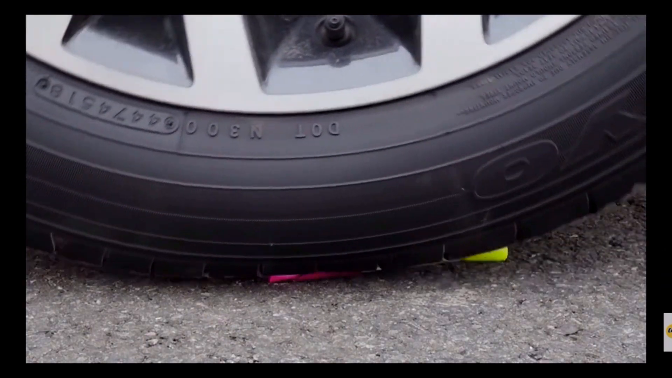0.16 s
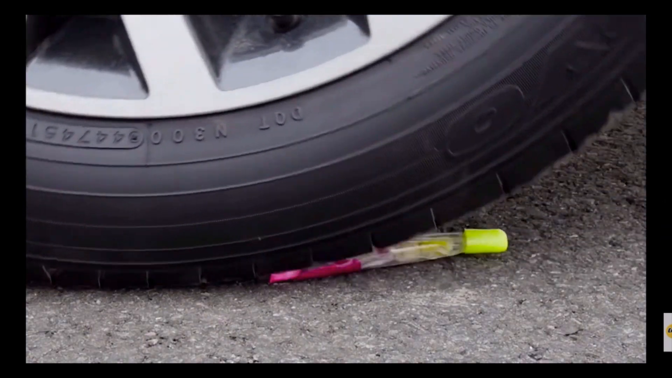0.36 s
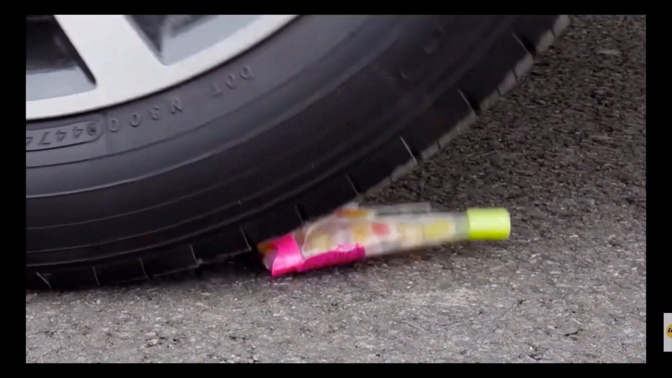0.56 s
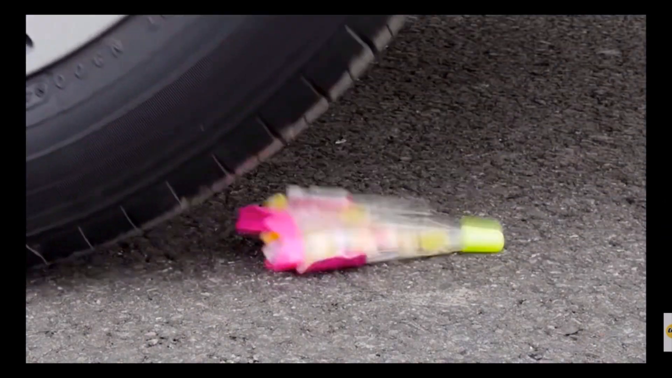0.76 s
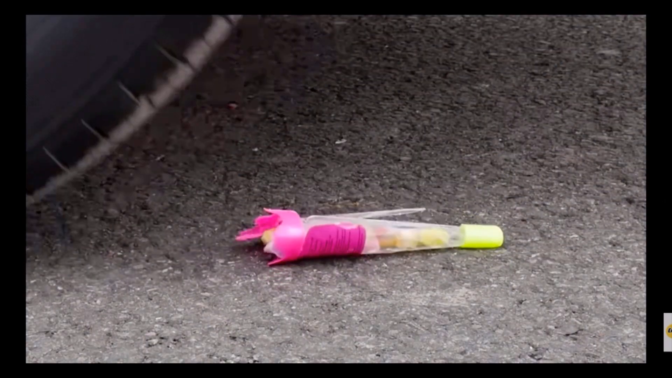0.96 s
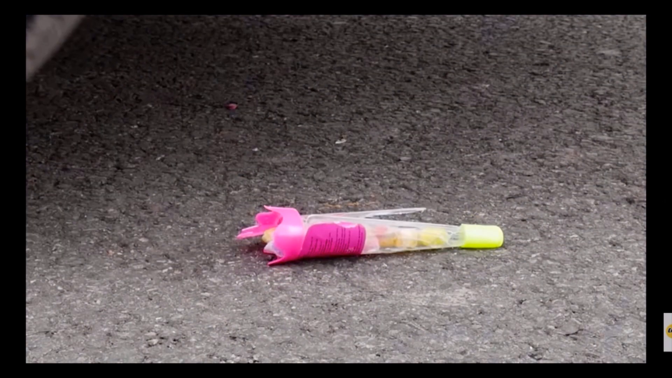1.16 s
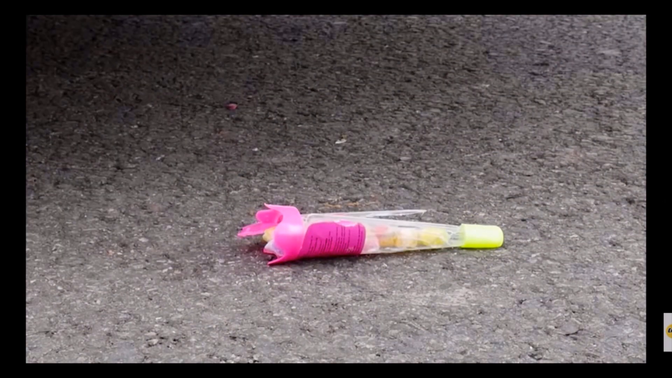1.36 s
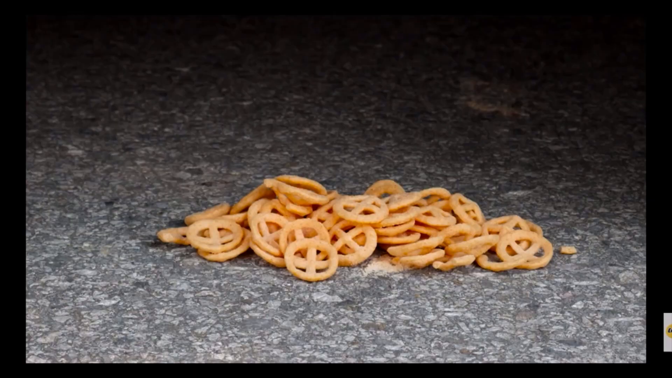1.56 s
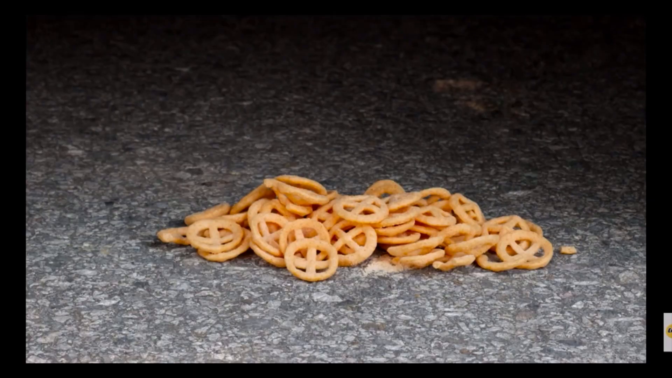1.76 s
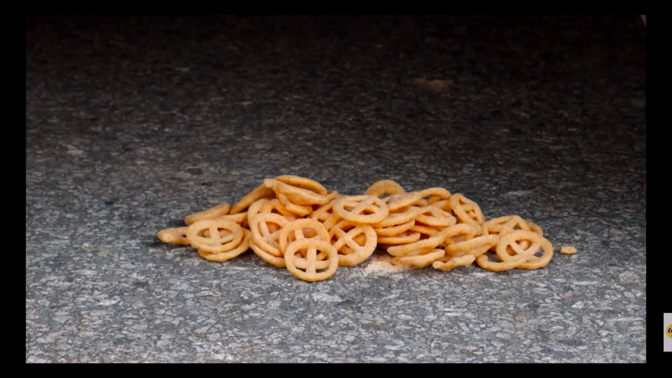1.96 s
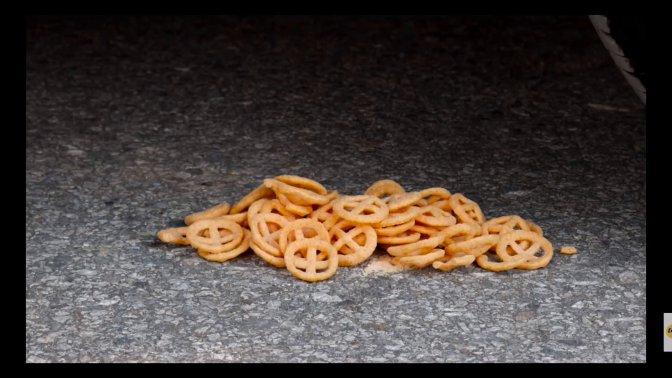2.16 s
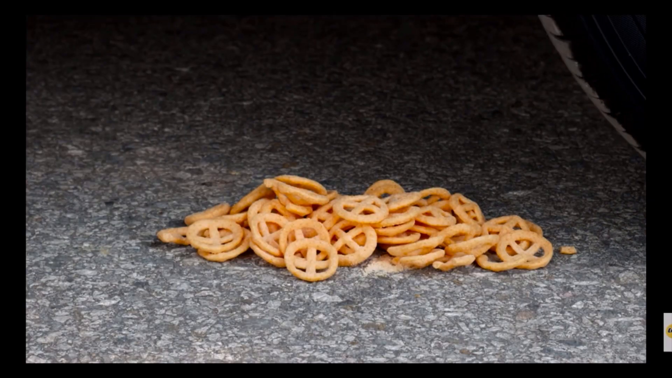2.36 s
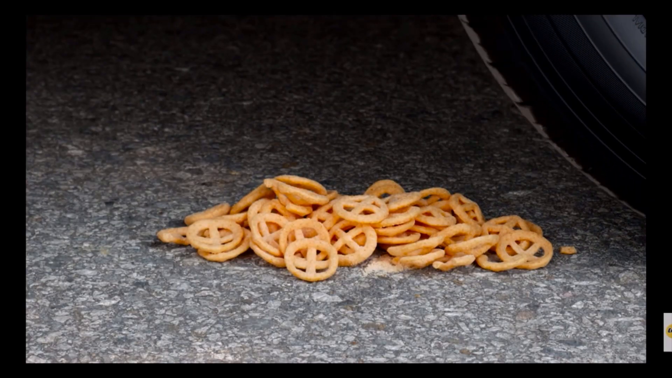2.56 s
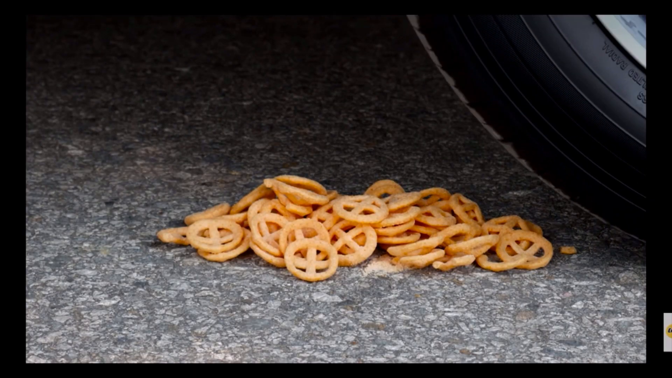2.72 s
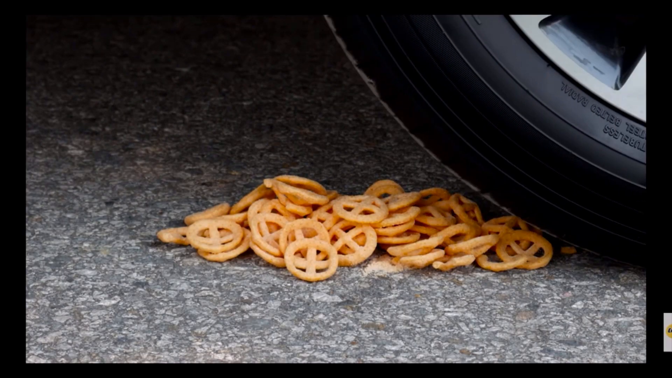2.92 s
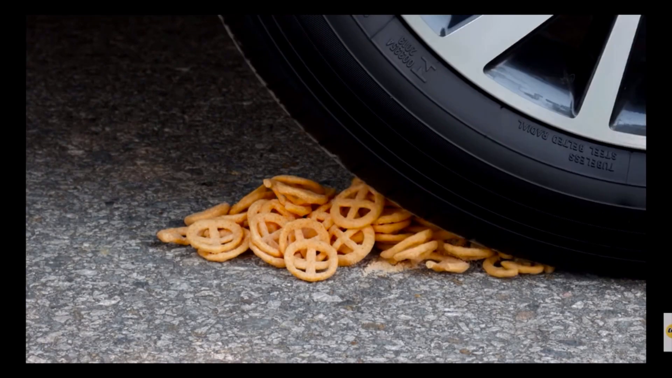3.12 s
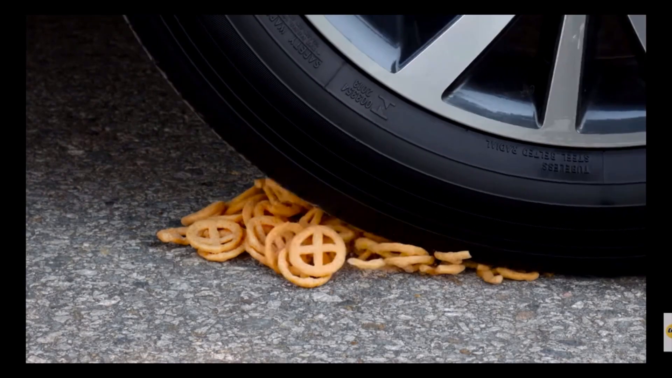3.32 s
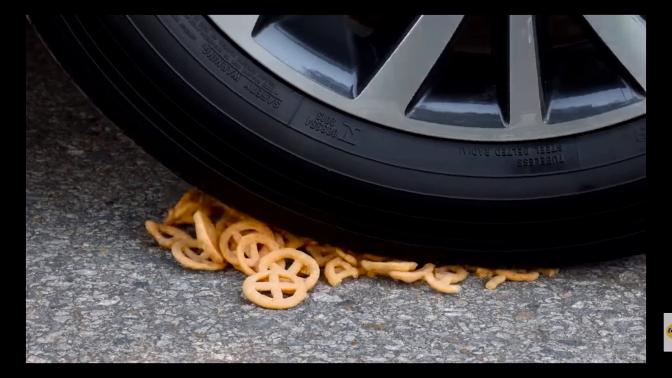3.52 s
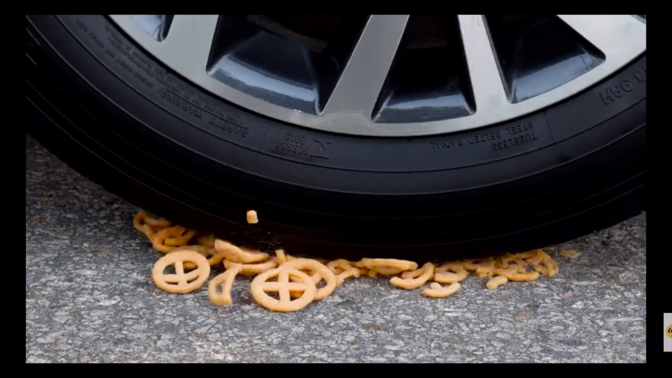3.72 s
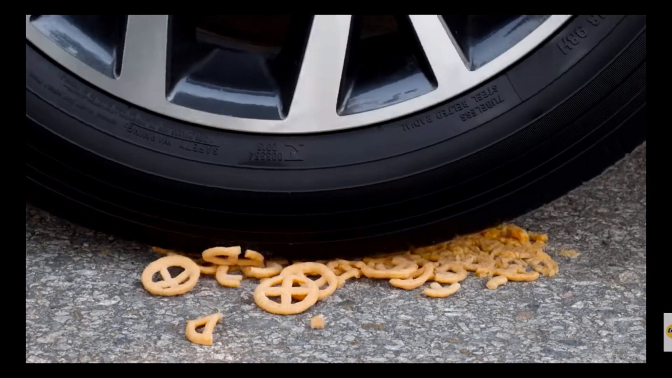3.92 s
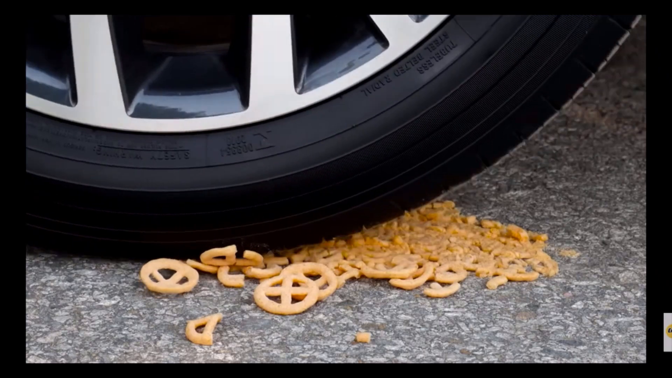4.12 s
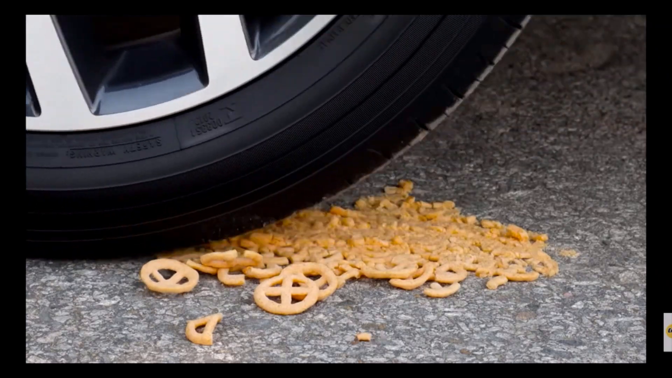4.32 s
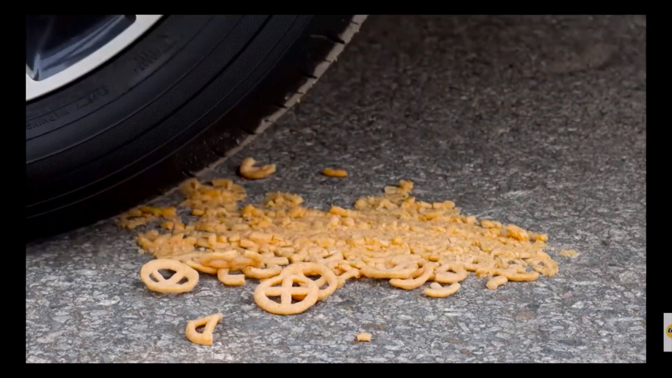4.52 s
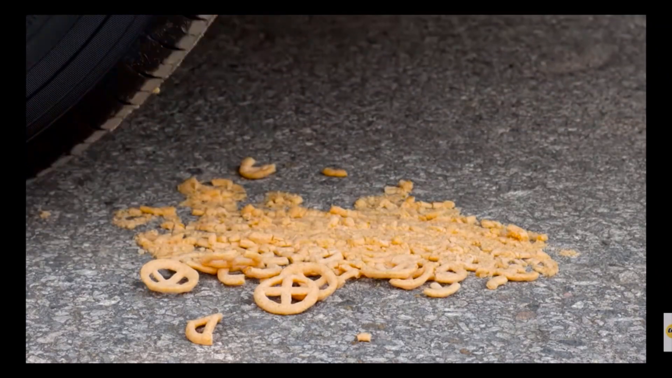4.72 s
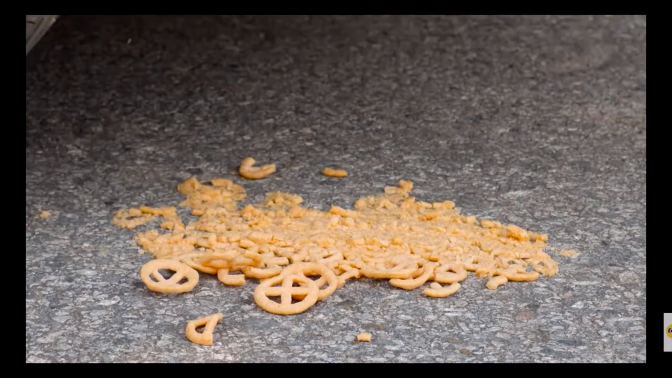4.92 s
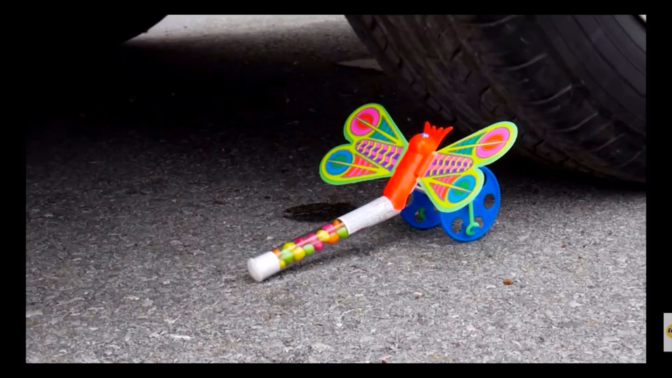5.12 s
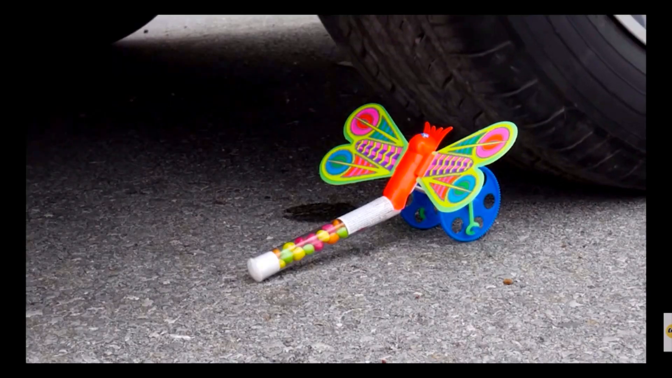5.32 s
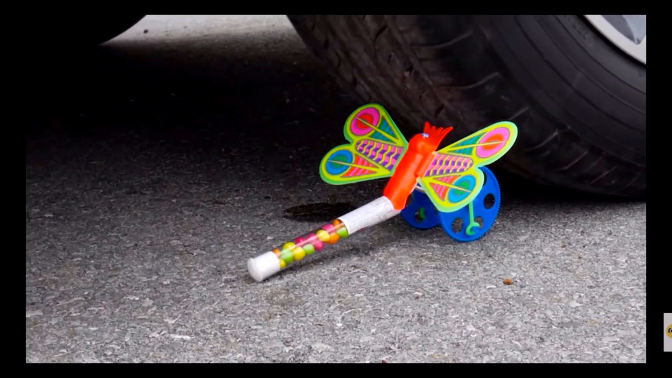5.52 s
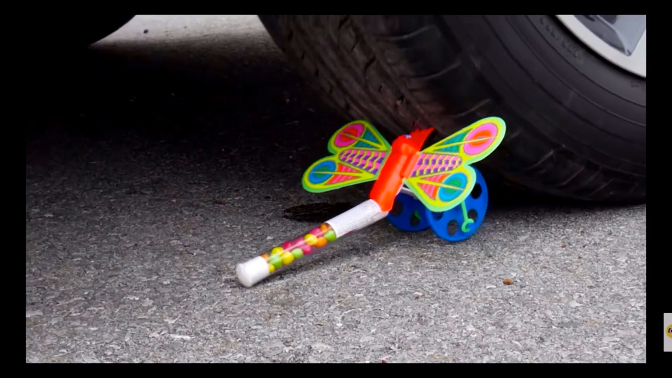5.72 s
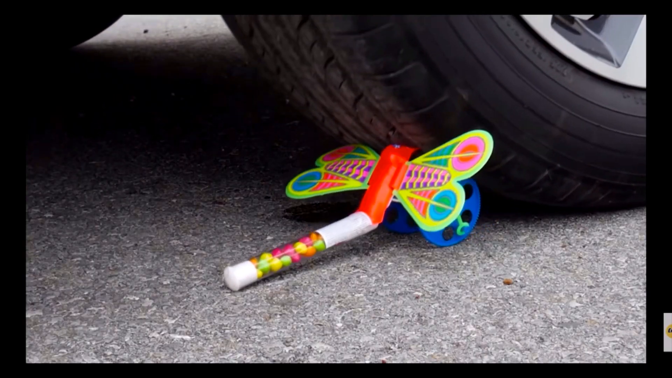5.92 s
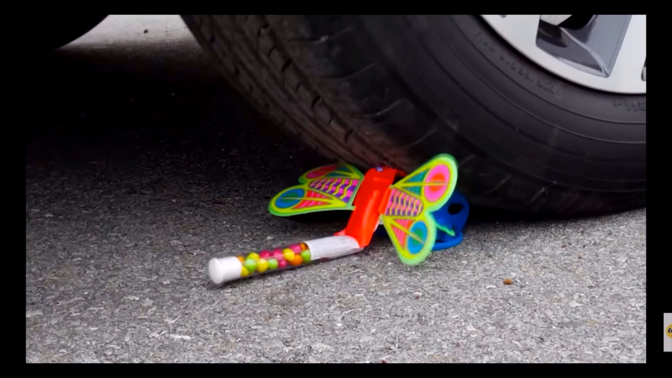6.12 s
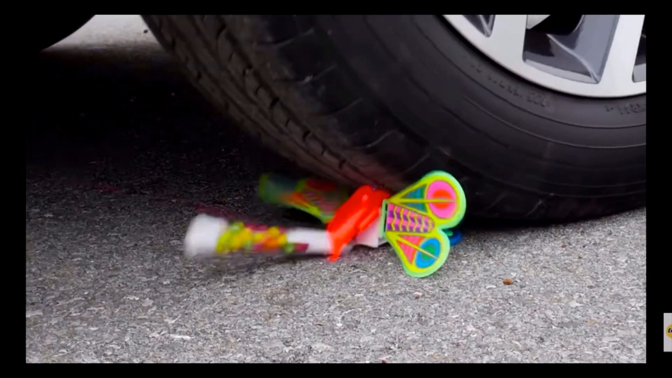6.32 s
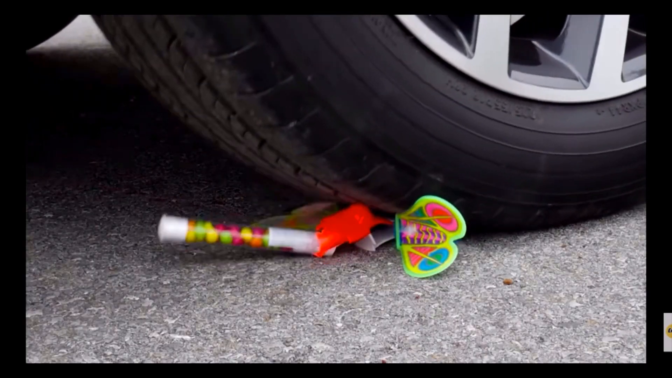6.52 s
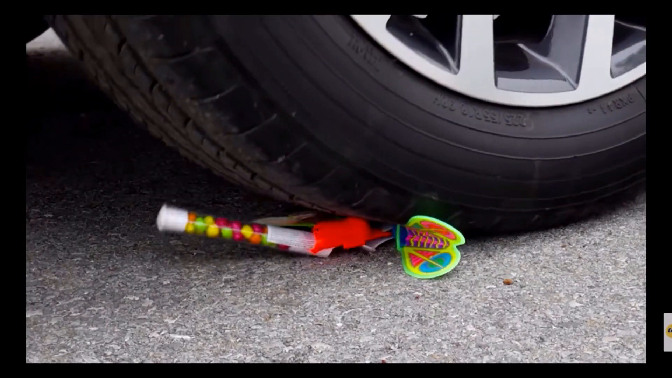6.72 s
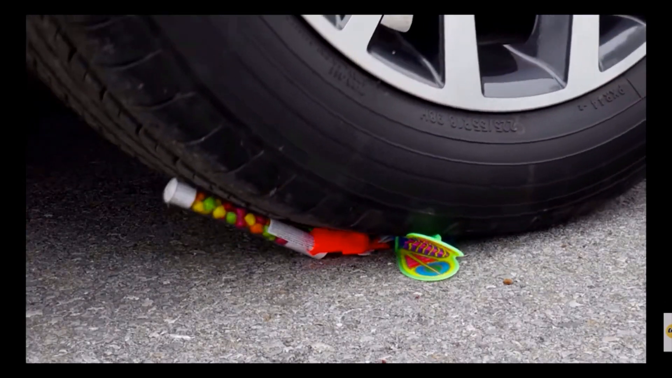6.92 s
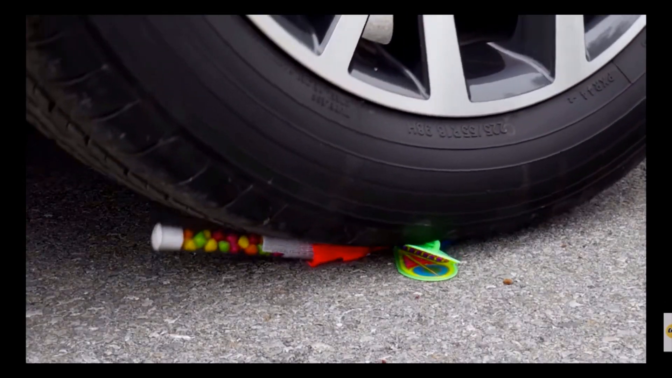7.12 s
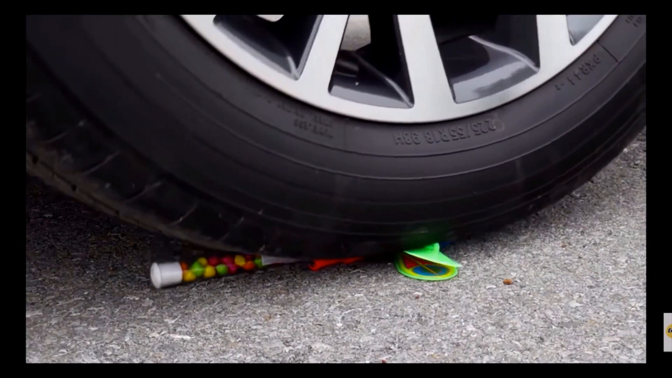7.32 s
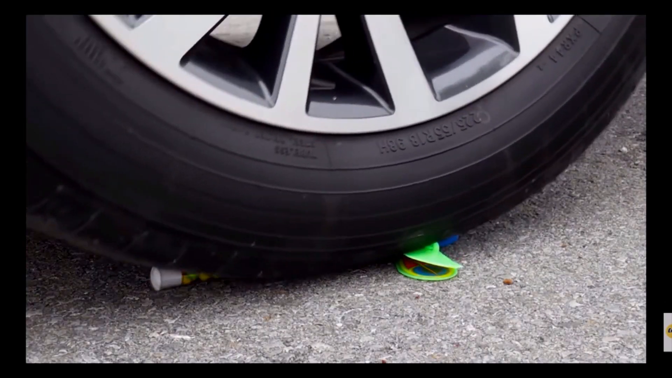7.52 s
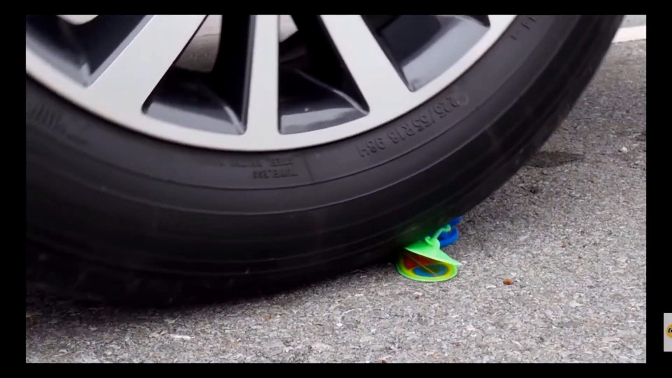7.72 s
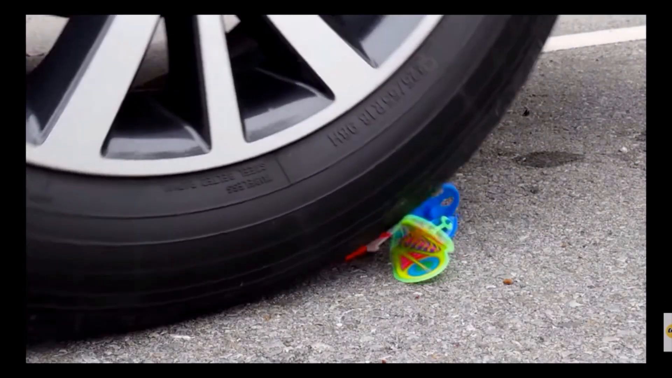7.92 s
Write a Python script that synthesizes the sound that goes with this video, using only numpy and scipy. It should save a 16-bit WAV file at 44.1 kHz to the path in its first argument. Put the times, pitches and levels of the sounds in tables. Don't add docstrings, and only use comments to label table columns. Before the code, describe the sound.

A small, close microphone at road level gives a dry, boxy, midrange sound with a slightly watery grain. From 0 to 0.9 seconds a tyre crushes a plastic toy: sharp irregular snaps and bright cracks, strongest near 0.2, 0.25 and 0.8, over faint grinding and a small thud. Then an idling engine is left, its valve clatter throbbing quickly over soft exhaust rumble, louder from 1.5, with a faint panel drone until about 2. From 2.9 to 4.2 dry snacks crunch in dense, surging, gritty grinding with loud pops, thinning to a few stray ticks by 4.5. Engine clatter returns around 5. From 5.6 to 8 a second plastic toy breaks in hard cracks, busiest from 5.8 to 6.9, then more scattered snaps and another flurry near 7.8, with dull knocks around 6.8, 7.6 and 7.8. Treble vanishes for brief instants throughout.

```python
import sys
import numpy as np
from scipy import signal
from scipy.fft import rfft, irfft
from scipy.io import wavfile
from scipy.ndimage import uniform_filter1d

SR = 44100
rng = np.random.default_rng(int(sys.argv[2]) if len(sys.argv) > 2 else 0)


def generate_wav(sig):
    pcm = np.round(np.clip(np.atleast_2d(sig).T, -1, 1) * 32767).astype(np.int16)
    wavfile.write(sys.argv[1], SR, pcm)


def linear_from_db(decibels):
    return 10 ** (np.asarray(decibels, float) / 20)


N = 351477
TIME = np.arange(N) / SR

# touch_s, leave_s, steady grinding level_db, crunch_db and fizz_db against it
HEAP_PASSES = [
    (-7, 0.93, -36.5, -6, -16.5),
    (3, 4.2, -24.5, -8.5, -7.5),
    (5.5, 14, -34, -12, -13.5),
]
# freq_hz, level_db
FRACTURE_COLOUR = [(200, -19.5), (350, -8), (580, -2.5), (1000, -3), (3000, 0.5), (6000, 5), (16000, 0)]


def evened(x):
    return x / np.sqrt(np.mean(x ** 2) + 1e-20)


def peaked(x, db):
    return linear_from_db(db) * x / abs(x).max()


def read(points, hz):
    f, value = np.transpose(points)
    return np.interp(np.log(hz + 1), np.log(f + 1), value)


def add(mix, start_s, sound):
    part = mix[round(start_s * SR):][:len(sound)]
    part += sound[:len(part)]


def band(x, lo_hz, hi_hz):
    edges_hz = [max(lo_hz, 20), min(hi_hz, 0.45 * SR)]
    return signal.sosfilt(signal.butter(4, edges_hz, "band", fs=SR, output="sos"), x)


def coloured(x, *tables, size=4096):
    # freq_hz, level_db
    mic_response = [(200, -27), (600, -13), (1000, -2.5), (3100, 0), (4000, -12), (5000, -7.5), (7500, -16),
                    (9500, -19.5), (13000, -35.5), (15400, -36), (16300, -79)]
    # centre_hz, width_hz, level_db
    mic_cavities = [(778, 86, -14.5), (1500, 104, -2.5), (5564, 366, -13), (6386, 810, 12.5),
                    (10240, 170, 5), (10720, 180, -6), (11340, 320, 6), (12400, 350, -13),
                    (13700, 500, 3.5)]
    hz = abs(np.fft.fftfreq(size, 1 / SR))
    db = read(mic_response, hz) + sum(read(table, hz) for table in tables)
    db = db + sum(g * np.exp(-0.5 * ((hz - f) / w) ** 2) for f, w, g in mic_cavities)
    log_gain = np.log(linear_from_db(db))
    taps = np.fft.ifft(np.exp(log_gain - 1j * signal.hilbert(log_gain).imag)).real
    return signal.oaconvolve(x, taps[:size // 2])[:len(x)]


def wander(hz):
    steps = rng.standard_normal(N // 64 + 2)
    smooth = uniform_filter1d(steps, int(SR / 128 / hz) + 1)
    slow = signal.lfilter([1], [1, -np.exp(-2 * np.pi * hz * 64 / SR)], smooth)
    return evened(np.interp(np.arange(N) / 64, np.arange(len(slow)), slow))


def waver(hz, width_hz):
    turn = 2 * np.pi * hz * TIME
    return wander(width_hz) * np.cos(turn) + wander(width_hz) * np.sin(turn)


def cracks(per_s, spread_db, clump_db, count=18):
    often = per_s / SR * linear_from_db(clump_db * wander(90.))
    size = linear_from_db(spread_db * np.minimum(rng.exponential(1, N), 4.1)) * (rng.random(N) < often)
    piece = rng.integers(0, count, N)
    t = np.arange(400) / SR
    out = np.zeros(N)
    for k, hz in enumerate(np.geomspace(520, 11500, count)):
        click = evened(rng.standard_normal(len(t)) * np.exp(-t / 0.0003))
        ring = evened(np.sin(2 * np.pi * hz * t) * np.exp(-t * hz / 2.96))
        out += signal.oaconvolve(size * (piece == k), click + 0.25 * ring)[:N]
    return coloured(out, FRACTURE_COLOUR)


def crushing():
    # start_s, hold_s, grinding level_db, brightness_db
    toy_surges = [
        (0, 0.021, -36.5, 3),
        (0.047, 0.017, -34, 0),
        (0.114, 0.029, -36, 1),
        (0.179, 0.021, -28, 7),
        (0.303, 0.019, -35, -5.5),
        (0.418, 0.02, -32, 0),
        (0.533, 0.06, -34, 3),
        (0.8, 0.016, -31, 1),
        (0.826, 0.0055, -26, 16.5),
        (0.834, 0.16, -32, 3),
    ]
    # start_s, hold_s, grinding level_db, brightness_db
    snack_surges = [(2.895, 0.13, -20.5, -10.5), (3.055, 0.069, -20.5, 3.5), (3.158, 0.19, -22.5, -0.5),
                    (3.34, 0.13, -20, -2.5), (3.576, 0.12, -18, -2), (3.736, 0.039, -23, -1),
                    (3.812, 0.049, -17.5, -6.5), (3.883, 0.076, -20.5, -2.5), (3.963, .055, -19.5, -8.5),
                    (4.05, .08, -19, -8), (4.158, 0.14, -24, -15)]
    # start_s, hold_s, grinding level_db, brightness_db
    second_toy_surges = [(5.622, 0.119, -12, -0.5), (5.77, 0.068, -20, -3), (5.863, 0.088, -31.5, 7),
                         (5.954, 0.087, -24.5, -9), (6.028, 0.016, -15, -3.5), (6.05, 0.036, -24, -2),
                         (6.104, 0.1, -26, 2), (6.236, 0.047, -19.5, 1), (6.499, 0.011, -18, -1.5),
                         (6.54, .02, -32, 3), (6.669, 0.057, -26, 0), (6.767, 0.047, -17, 0),
                         (7.04, 0.027, -34, 1), (7.236, 0.077, -31, -5), (7.42, 0.045, -27, -5.5),
                         (7.523, 0.088, -24.5, -8), (7.63, 0.027, -16.5, -3.5), (7.673, .09, -25, -9.5),
                         (7.765, 0.04, -22, -1.5), (7.942, 0.015, -21.5, -3.5)]
    bite_db_per_s, lift_db_per_s = 188, 218
    swell_s, settle_s = 0.0065, 0.018

    grains = cracks(per_s=3600, spread_db=3.6, clump_db=3.6)
    crunch = band(grains, 262, 1445)
    grind = band(grains, 1613, 4215)
    fizz = band(grains, 4800, 22000)
    layers = np.array([evened(crunch), evened(grind), fizz / np.std(band(fizz, 6480, 8700))])
    load = np.zeros((3, N))
    all_surges = (toy_surges, snack_surges, second_toy_surges)
    for (touch, leave, steady_db, crunch_db, fizz_db), surges in zip(HEAP_PASSES, all_surges):
        slope_db = np.minimum(bite_db_per_s * (TIME - touch), lift_db_per_s * (leave - TIME))
        pressed = linear_from_db(np.minimum(slope_db, 0))
        power = linear_from_db(steady_db) ** 2 * np.ones((3, N))
        for start, hold, db, bright_db in surges:
            near = slice(max(round((start - 0.3) * SR), 0), round((start + 0.4) * SR))
            late = TIME[near] - start
            away = np.maximum(-late / swell_s, (late - hold) / settle_s)
            shape = np.exp(-np.maximum(away, 0))
            tilt_db = bright_db * np.array([[-1], [0], [1]])
            power[:, near] += (shape * linear_from_db(db + tilt_db)) ** 2
        layer_db = np.array([[crunch_db], [0], [fizz_db]]) - 5.5
        load += pressed * np.sqrt(power) * linear_from_db(layer_db)
    return (load * layers).sum(0)


def snaps():
    # time_s, ring peak_db, ring_hz, splinters_db against the ring
    toy_snaps = [(0.0553, -22, 2580, -1), (0.0703, -22.5, 1970, 6.5), (0.1078, -9.5, 2080, -7),
                 (0.1176, -6.5, 1140, -17), (0.1293, -20, 1200, -7), (0.1346, -8.5, 2910, -7),
                 (0.1468, -14, 1130, -13), (0.1687, -11.5, 2760, -6), (0.18, -3, 2160, -13.5),
                 (0.2234, -24.5, 2200, 5), (0.2332, -22, 1780, 0), (0.2578, -2, 1990, -17.5),
                 (0.305, -15, 1990, -13.5), (0.3166, -13, 2770, -19), (0.3798, -11.5, 2960, -15),
                 (0.4144, -17, 2260, -19), (0.4228, -15.5, 2750, -4), (0.4758, -18.5, 2900, -17),
                 (0.5368, -14, 2330, -11.5), (0.5455, -26, 2280, -6), (0.6242, -16, 2980, -12),
                 (0.7192, -17, 2160, -18), (0.7765, -2.5, 2300, -22), (0.8086, -18, 2270, -8),
                 (0.824, -11.5, 3320, 0), (0.8274, -17, 2820, 2), (0.8693, -21.5, 2100, 2.5),
                 (0.9128, -21, 2100, -5.5)]
    # time_s, ring peak_db, ring_hz, splinters_db against the ring
    snack_snaps = [(3.0438, -9.5, 1240, -2), (3.0599, -9, 2730, -11), (3.0722, -9, 2590, -2),
                   (3.0919, -5.5, 3250, -16), (3.1232, -6, 2420, -27), (3.1537, -11, 2410, -3),
                   (3.1695, -11, 2300, -15), (3.2081, -3, 1940, -16), (3.2725, -5, 2220, -28),
                   (3.337, -3, 2000, -32), (3.395, -1.5, 1920, -14), (3.6882, 1.5, 1550, -23),
                   (3.7166, -21, 2905, -18), (3.7263, -14, 1140, -15), (3.7756, -4.5, 1260, -19),
                   (3.8136, -11, 2640, -11), (4.0214, -15, 2107, -6.5), (4.078, -4.5, 2110, -26),
                   (4.146, -6.5, 1160, -18), (4.1818, -6, 1040, -35), (4.1964, -10.5, 1050, -34),
                   (4.2552, -10.5, 2100, -38), (4.3275, -25, 1120, -43), (4.548, -27, 2800, -9)]
    # time_s, ring peak_db, ring_hz, splinters_db against the ring
    second_toy_snaps = [(5.6305, -10, 1650, -31), (5.667, -5, 1910, -18), (5.7745, -9, 2500, -9),
                        (5.8606, -1, 2190, -28), (5.8773, -7, 3210, -13), (5.8928, -18, 2760, 0.5),
                        (6.0325, -9, 1230, -9), (6.0489, -8.5, 3060, -5.5), (6.0681, -6, 3100, -14.5),
                        (6.1044, -3, 2930, -12), (6.1093, -6.5, 1900, -8), (6.1394, 1.5, 2290, -19),
                        (6.1616, -13, 3050, -23), (6.2472, -5, 3400, -21), (6.294, 1.5, 2220, -21),
                        (6.3094, -0.5, 2920, -10.5), (6.334, -11, 2200, -6), (6.356, -16, 1920, 0),
                        (6.4017, -26, 3050, -20), (6.4533, -17, 1350, -13), (6.4881, -5.5, 2020, -8.5),
                        (6.5089, -5.5, 2640, -24), (6.5271, -2, 3020, -23), (6.5385, -7.5, 2360, -8),
                        (6.6192, -13, 1960, -15), (6.7087, -10, 2300, -6), (6.774, -2.5, 3220, -18),
                        (6.7904, -8.5, 2870, -6), (6.8538, -1, 2080, -25), (6.9188, -6, 1790, -37)]
    # time_s, ring peak_db, ring_hz, splinters_db against the ring
    stick_snaps = [(6.9495, -6.5, 1800, -4), (6.989, -13, 3170, -25), (7.0344, -3.5, 3400, -23),
                   (7.0436, -12, 1910, -36), (7.1544, -7, 3120, -23), (7.239, -13, 2000, -12),
                   (7.3087, -6, 2120, -10), (7.3782, -2, 2520, -30), (7.423, -9, 2260, -12),
                   (7.4784, -13.5, 2840, -6), (7.501, -12.5, 1530, -10), (7.5235, -11, 2150, -22),
                   (7.5312, -17, 2110, -8), (7.5547, -11, 1790, -11), (7.5664, -11, 2170, -9),
                   (7.578, -17, 1350, -1), (7.6286, -13.5, 1230, 0.5), (7.6332, -8, 3270, -13),
                   (7.6428, -14, 1610, -9), (7.659, -3.5, 2250, -33), (7.7707, -15, 1620, -1),
                   (7.8207, -4, 2100, -30), (7.8422, -2.5, 2400, -12), (7.8552, -7, 2130, -29),
                   (7.8701, -8, 2220, -25), (7.8813, -1, 1790, -34), (7.8987, -12.5, 1940, -8),
                   (7.9099, -8.5, 1840, -20), (7.9204, -8, 1760, -14), (7.943, -11.5, 2140, -4.5)]
    ring_lift_db, splinter_lift_db = -2, 3.5
    dust_level_db, dust_follows, dust_spread_db = -22.5, 0.66, 14

    rows = [*toy_snaps, *snack_snaps, *second_toy_snaps, *stick_snaps]
    t = np.arange(1024) / SR
    out = np.zeros(N)
    noise = rng.standard_normal((len(rows), len(t)))
    chance = rng.random((len(rows), 3))
    burst = np.minimum(t / 0.00012, 1) * (np.exp(-t / 0.0009) + 0.05 * np.exp(-t / 0.004))
    sprays = coloured((noise * burst).ravel(), FRACTURE_COLOUR).reshape(noise.shape)
    rattles = band(sprays, 470, 3940)
    splinters = band(sprays, 4070, 7800)
    dusts = band(sprays, 9300, 14300)
    for k, (start, ring_db, hz, bright_db) in enumerate(rows):
        upper_hz = hz * (1.4 + 0.5 * chance[k, 0])
        lower_hz = hz * (0.5 + 0.49 * chance[k, 1])
        ring = np.sin(2 * np.pi * hz * t) * t * np.exp(-t / 0.00042) / 0.00089
        ring += 0.1 * np.sin(2 * np.pi * upper_hz * t) * np.exp(-t / 0.0007)
        ring += 0.025 * np.sin(2 * np.pi * lower_hz * t) * np.exp(-t / 0.0029)
        body = band(peaked(ring, 0) + peaked(rattles[k], -9), 880, 4600)
        splinter_db = ring_db + bright_db + splinter_lift_db
        dust_db = dust_level_db + dust_follows * splinter_db + dust_spread_db * (chance[k, 2] - 0.5)
        spray = peaked(splinters[k], splinter_db) + peaked(dusts[k], dust_db)
        add(out, start - 0.0003, peaked(body, ring_db + ring_lift_db) + spray)
    return out


def underbody(x):
    t = np.arange(2600) / SR
    sparse = rng.standard_normal(len(t)) * (rng.random(len(t)) < 0.05)
    taps = sparse * linear_from_db(-60 * t / 0.11) * (t > 0.002)
    return signal.oaconvolve(x, taps / np.linalg.norm(taps))[:N]


def thuds():
    # time_s, peak_db, pitch_hz
    pushes = [
        (0.118, -30.5, 298),
        (6.71, -36, 300),
        (6.775, -25.5, 560),
        (6.791, -28, 207),
        (6.853, -29.5, 500),
        (6.951, -26.5, 190),
        (7.63, -23, 342),
        (7.772, -21.5, 543),
        (7.842, -31, 192),
    ]
    t = np.arange(1024) / SR
    out = np.zeros(N)
    for start, db, hz in pushes:
        push = np.sin(2 * np.pi * hz * t) * t * np.exp(-t / 0.001)
        add(out, start, peaked(push, db - 3.5))
    return out


def ducking():
    # start_s, exhaust rumble at rest_db
    scenes = [
        (0, -42),
        (1.48, -46),
        (4.97, -45.5),
    ]
    duck_db, duck_s, recover_db_per_s = 10, 0.63, 6
    starts, rest_db = np.transpose(scenes)
    current = np.clip(np.searchsorted(starts, TIME, "right") - 1, 0, 2)
    touch, leave = np.transpose(HEAP_PASSES)[:2, current]
    sunk_db = duck_db * (1 - np.exp(-np.maximum(TIME - touch, 0) / duck_s))
    recovered_db = recover_db_per_s * np.maximum(TIME - leave, 0)
    return rest_db[current] - np.maximum(sunk_db - recovered_db, 0)


def engine():
    # time_s, clatter level_db
    clatter_levels = [(0, -55.5), (1.0, -39), (1.47, -36), (1.49, -30), (2.0, -30), (2.9, -31.5), (3.6, -24),
                      (4.3, -39), (4.45, -46), (4.95, -39), (4.98, -29.5), (5.6, -30), (6.4, -52), (7.0, -42),
                      (7.97, -40)]
    # freq_hz, level_db
    clatter_colour = [(300, -3.5), (500, -6), (1000, 0), (2000, -2), (3200, -4.5), (5000, -14), (8000, -19),
                      (16000, -19)]
    # freq_hz, density_db per Hz
    rumble_colour = [(15, -52), (25, -9), (54, -17), (85, -14), (124, -6), (174, -32), (208, -5.5),
                     (430, 1.5), (700, 1), (910, -7), (1540, -120)]
    # pitch_hz, width_hz, level_db
    orders = [(86, 11.7, -19.5), (176.4, 19.3, -14), (297.6, 29, -13)]
    throb_hz, throb_depth_db = 22, 0.77

    time_s, clatter_db = np.transpose(clatter_levels)
    firing = np.cumsum(throb_hz * (1 + 0.0413 * wander(2.3))) / SR
    throb_db = throb_depth_db * np.cos(2 * np.pi * firing) + 0.59 * np.cos(4 * np.pi * firing)
    throb_db += 0.8 * wander(31.0)
    clatter = evened(coloured(rng.standard_normal(N) * linear_from_db(throb_db), clatter_colour))
    rumble_gain = linear_from_db(read(rumble_colour, np.fft.rfftfreq(N, 1 / SR)))
    rumble = evened(irfft(rfft(rng.standard_normal(N)) * rumble_gain, N))
    for hz, width_hz, db in orders:
        rumble += linear_from_db(db - 0.5 + 3.5 * wander(2.4)) * waver(hz, width_hz)
    rumble_db = ducking() + 2.2 * wander(26.0)
    return linear_from_db(np.interp(TIME, time_s, clatter_db)) * clatter + linear_from_db(rumble_db) * rumble


def drones():
    # middle_s, spread_s, pitch_hz, width_hz, level_db
    panels = [
        (1.654, 0.29, 425, 13, -51.5),
        (1.94, 0.073, 485, 18, -44),
    ]
    out = np.zeros(N)
    for middle, spread, hz, width_hz, db in panels:
        swell = np.exp(-0.5 * ((TIME - middle) / spread) ** 2)
        out += linear_from_db(db) * swell * waver(hz, width_hz)
    return out


def scene():
    broken = snaps()
    echoes = linear_from_db(-16) * underbody(broken)
    return (engine() + drones() + crushing() + thuds() + broken + echoes)[None]


def speckled(x, contrast):
    z = signal.stft(x, nperseg=1024, noverlap=768)[2]
    around = uniform_filter1d(abs(z), size=9, axis=1) + 1e-12
    return signal.istft(z * (abs(z) / around) ** contrast, nperseg=1024, noverlap=768)[1][:, :N]


def treble_dropouts(x):
    # start_s, length_s, lowest kept_hz
    dropouts = [(0.74, 0.014, 40), (0.842, 0.0066, 700), (1.167, 0.077, 40), (1.993, 0.034, 40),
                (2.735, 0.007, 500), (3.064, 0.028, 625), (3.341, 0.0088, 300), (3.429, 0.0093, 100),
                (3.64, 0.052, 450), (4.01, 0.0029, 40), (5.027, 0.026, 253), (5.5, 0.026, 40),
                (6.664, 0.016, 40), (7.011, 0.012, 200), (7.069, 0.023, 40), (7.182, 0.013, 40),
                (7.457, 0.015, 40), (7.538, 0.015, 500), (7.647, 0.016, 200), (7.86, 0.022, 600),
                (7.95, 0.01, 300)]
    flickers = [(s, 0.011, 40) for s in rng.uniform(1.3, 5.5, size=24) if abs(s - 3.65) > 0.7]
    out = x.copy()
    for start, length, lo_hz in [*dropouts, *flickers]:
        a = round((start - 0.02) * SR)
        b = min(round((start + length + 0.02) * SR), N)
        hz = np.fft.rfftfreq(b - a, 1 / SR)
        loud = ((hz > lo_hz) & (hz < 4150)) | (abs(hz - 4850) < 80) | (abs(hz - 6680) < 920)
        kept = irfft(rfft(x[:, a:b]) * loud, b - a)
        inside_s = np.minimum(TIME[a:b] - start, start + length - TIME[a:b])
        fade = np.clip(inside_s / 0.007 + 0.5, 0, 1)
        out[:, a:b] += np.sin(np.pi / 2 * fade) ** 2 * (kept - out[:, a:b])
    return out


def roll_off(x):
    return signal.sosfilt(signal.butter(12, 16510, fs=SR, output="sos"), x)


def record(dry):
    bass_cut = signal.butter(1, 45, "high", fs=SR, output="sos")
    x = signal.sosfilt(bass_cut, speckled(dry, contrast=0.4))
    limited = np.clip(x, -0.72, 0.72)
    return roll_off(treble_dropouts(limited))


dry = scene()
out = record(dry)
generate_wav(out)
```